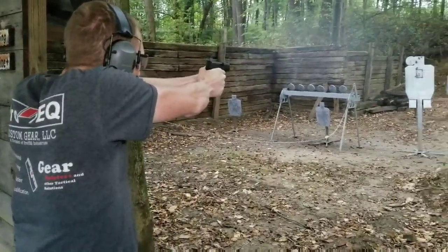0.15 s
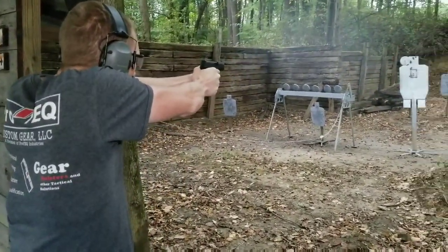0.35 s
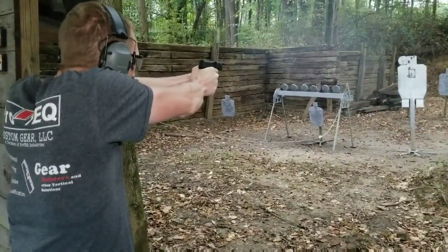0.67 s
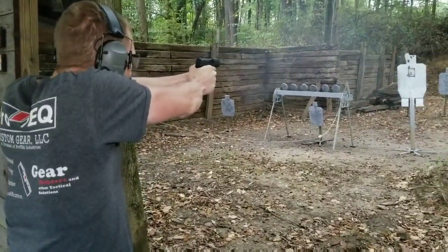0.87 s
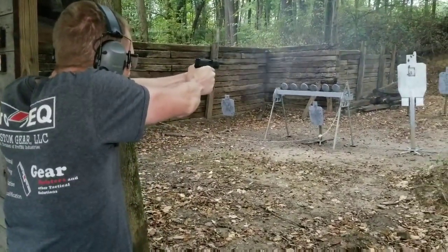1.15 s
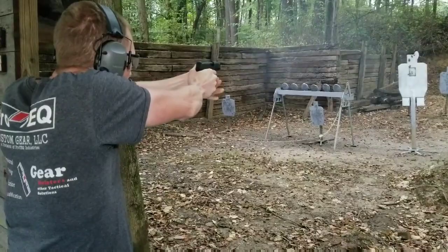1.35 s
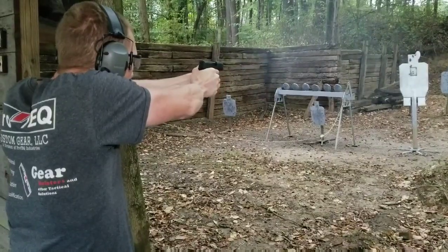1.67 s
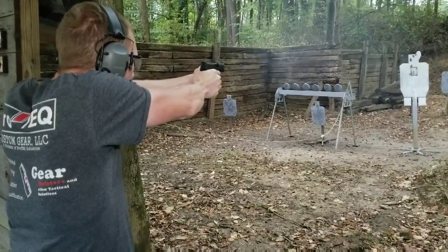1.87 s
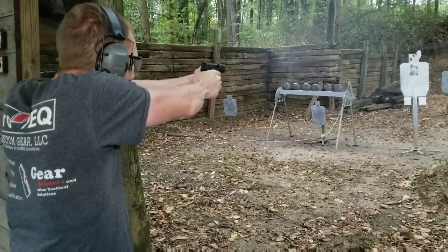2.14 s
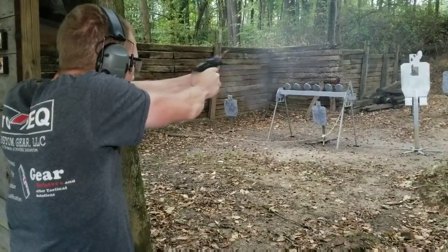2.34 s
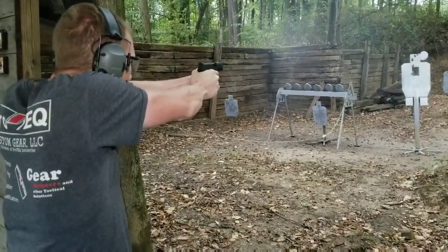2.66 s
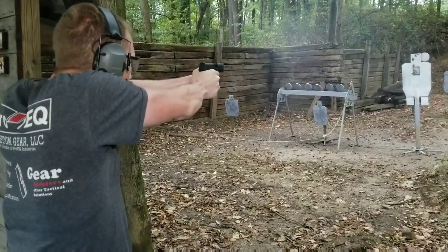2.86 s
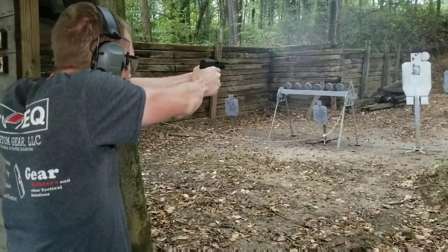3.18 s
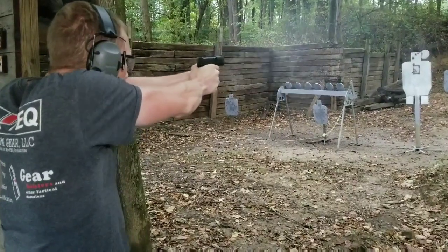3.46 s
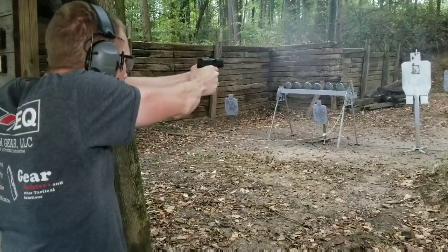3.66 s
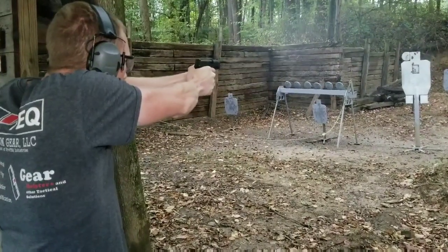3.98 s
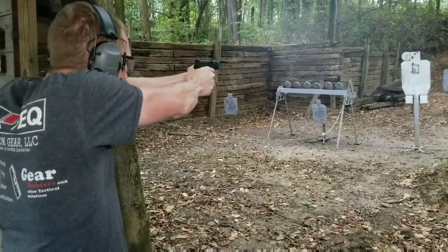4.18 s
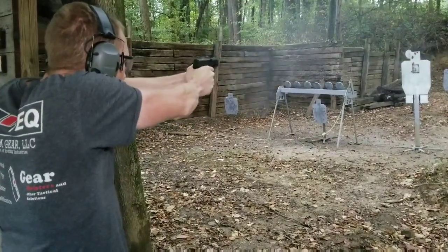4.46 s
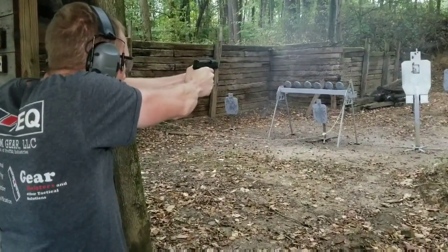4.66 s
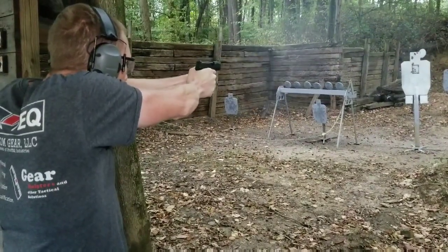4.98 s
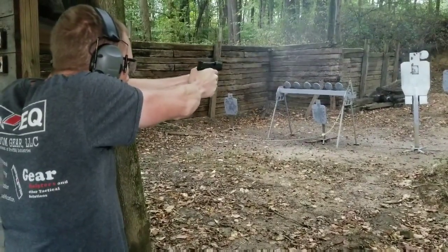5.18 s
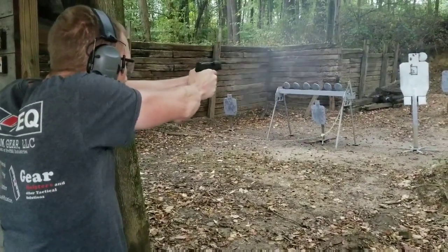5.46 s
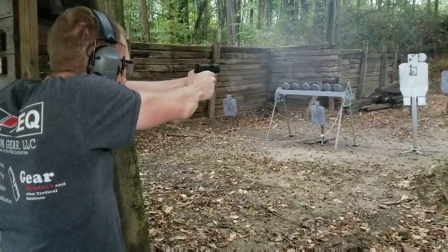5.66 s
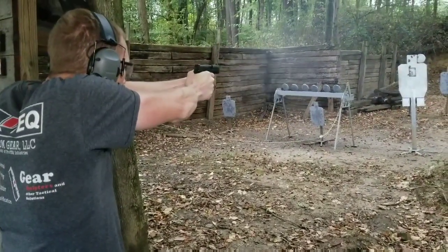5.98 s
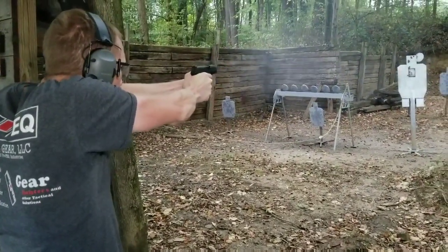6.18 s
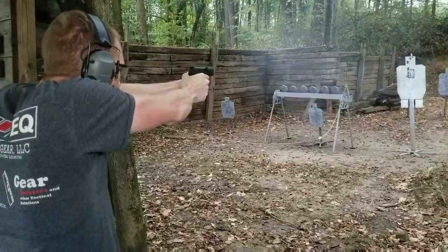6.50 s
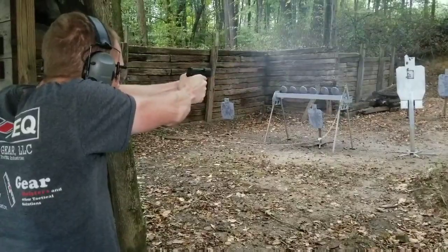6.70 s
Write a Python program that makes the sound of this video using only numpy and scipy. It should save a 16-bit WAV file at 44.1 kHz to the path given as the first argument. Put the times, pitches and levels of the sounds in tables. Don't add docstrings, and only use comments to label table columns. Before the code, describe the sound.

An echo fades, then a handgun fires six spaced single shots in a wooded clearing, with steel rattling and small brass cases landing on leaves.

```python
import sys
import numpy as np
from scipy import signal
from scipy.fft import rfft, irfft
from scipy.io import wavfile
from scipy.ndimage import uniform_filter1d

SR = 44100
rng = np.random.default_rng(int(sys.argv[2]) if len(sys.argv) > 2 else 0)


def volts_from_decibels(level):
    exponent = np.asarray(level, float) / 20
    return 10 ** exponent


def unload_audio(sound):
    columns = np.transpose(np.atleast_2d(sound))
    steps = np.round(np.clip(columns, -1, 1) * 32767)
    wavfile.write(sys.argv[1], SR, steps.astype(np.int16))


N = 301186
ECHO_SIZE = 76800

# frequency in Hz, level in dB per Hz.
CLEARING = [(18, -44.5), (30, -9.5), (168, -15), (237, -4), (292, -11.5), (359, -2.5), (500, -7),
            (720, -4.5), (1110, -5.5), (1590, -11.5), (2130, -12), (4200, -18.5), (8800, -28.5),
            (15500, -31.5)]
# frequency in Hz, level in dB per Hz.
TRUNKS = [(18, -66), (30, -25), (126, -14.5), (432, -18.5), (606, -2), (787, -9), (1110, -7), (1600, -16),
          (2130, -8.5), (3000, -14), (5740, -19), (8100, -16), (8900, -26.5), (15500, -32.5)]
# frequency in Hz, level in dB per Hz.
DEEP_WOODS = [(18, -72.5), (30, -32.5), (69, -24.5), (260, -19.5), (432, -13.5), (728, -12.5), (1100, -12),
              (1550, -15), (2200, -9.5), (2900, -19.5), (5000, -25), (8500, -29.5), (15500, -41)]
# delay in seconds, lift in dB.
REFLECTORS = [(.069, 2), (0.134, 2.5), (0.173, 2), (.212, 0.5), (.343, 1.5), (0.423, 0.5), (.52, 0.5)]


def evened(x):
    return x / np.sqrt(np.mean(x ** 2) + 1e-20)


def read(points, hz):
    f, value = np.transpose(points)
    return np.interp(np.log(hz + 1), np.log(f + 1), value)


def add(mix, s, sound):
    at = round(s * SR)
    sound = sound[:, max(-at, 0):]
    part = mix[:, max(at, 0):][:, :sound.shape[1]]
    part += sound[:, :part.shape[1]]


def ports(z, hz):
    # frequency in Hz, left-right likeness from -1 to 1.
    likeness = [(60, .6), (130, .8), (290, .86), (600, .78), (950, .55), (1410, .1), (3100, .05),
                (15000, -.05)]
    # frequency in Hz, left minus right in dB.
    lean = [(60, 2), (180, 0.5), (550, 1), (1650, 3), (4970, 1.0), (15000, -2.5)]
    same = np.clip(read(likeness, hz), -1, 1)
    tilt = volts_from_decibels(read(lean, hz) / 2)
    left = z[0] * tilt
    right = (same * z[0] + np.sqrt(1 - same ** 2) * z[1]) / tilt
    return np.array([left, right])


def hiss(spectrum, size):
    hz = np.fft.rfftfreq(size, 1 / SR)
    pair = ports(rfft(rng.standard_normal((2, size))), hz)
    return evened(irfft(pair * volts_from_decibels(read(spectrum, hz)), size))


def fading(x, t60s):
    hz, t, z = signal.stft(x, SR, nperseg=512, noverlap=384)
    z = z * volts_from_decibels(-60 * t / read(t60s, hz)[:, None])
    return signal.istft(z, SR, nperseg=512, noverlap=384)[1][:, :x.shape[1]]


def panned(x, pan_db):
    return x * volts_from_decibels(np.array([[pan_db / 2], [-pan_db / 2]]))


def quiet_air():
    # frequency in Hz, level in dB per Hz.
    air = [(18, -16.5), (40, -4.5), (90, -4), (160, -20.5), (369, 0), (747, 0.5), (1100, -6), (2130, -18.5),
           (3590, -29.5), (8000, -29.5), (15500, -34)]
    return volts_from_decibels(-77.5) * hiss(air, size=N)


def timber(size):
    # frequency in Hz, level in dB, t60 in seconds.
    shelter = [(123.5, -21, .15), (182.6, -20, 0.12), (231, -18, .12), (603, -13.5, 0.11), (742, -13, .14)]
    wall_s, wall_db, wall_hz, wall_t60 = 0.0646, 9.5, 720, 0.02
    slap_db, slap_db_per_s, slap_hz, slap_t60 = -11, -60, 680, 0.03
    t = np.arange(size) / SR
    late = np.maximum(t - wall_s, 0)
    wall_level = volts_from_decibels(wall_db - 60 * late / wall_t60) * np.clip(late / 0.0009, 0, 1)
    out = wall_level * np.sin(2 * np.pi * wall_hz * late)
    for s, lift in REFLECTORS[1:]:
        since = np.maximum(t - s + 0.00522, 0)
        rise = np.clip(since / 0.0022, 0, 1)
        level = volts_from_decibels(slap_db + lift + slap_db_per_s * s - 60 * since / slap_t60)
        out = out + level * rise * np.sin(2 * np.pi * slap_hz * since)
    for hz, db, t60 in shelter:
        level = volts_from_decibels(db - 60 * late / t60) * np.clip(t / 0.015, 0, 1)
        out = out + level * np.sin(2 * np.pi * hz * t)
    return out


def rolling_echo(place):
    # frequency in Hz, likeness of two shots from 0 to 1.
    repeat = [(60, .8), (300, .97), (1200, .96), (2500, .8), (6000, .45), (12000, .25)]
    # frequency in Hz, t60 in seconds.
    clearing_t60 = [(50, 0.16), (200, 0.28), (700, 0.26), (2000, 0.23), (5000, 0.19), (9000, 0.22),
                    (14000, .2)]
    # frequency in Hz, t60 in seconds.
    trunks_t60 = [(50, 0.82), (160, 0.72), (300, 0.98), (700, 1), (2000, 0.87), (5000, 0.84), (9000, .7),
                  (14000, 0.92)]
    # frequency in Hz, t60 in seconds.
    deep_t60 = [(100, 1.4), (700, 2.93), (2200, 1.985), (4000, 1.96), (8000, 1.3)]
    size = place[0].shape[1]
    same = read(repeat, np.fft.rfftfreq(size, 1 / SR))
    layers = []
    for old, colour in zip(place, (CLEARING, TRUNKS, DEEP_WOODS)):
        fresh = rfft(hiss(colour, size=size))
        layers.append(irfft(same * rfft(old) + np.sqrt(1 - same ** 2) * fresh, size))
    near, trees, far = layers
    echo = volts_from_decibels(13.5) * fading(near, clearing_t60)
    echo = echo + volts_from_decibels(-10) * fading(trees, trunks_t60)
    return echo + volts_from_decibels(-27) * fading(far, deep_t60)


def gas_crack(t):
    # frequency in Hz, level in dB per Hz.
    jet = [(1000, -25.5), (4000, -5.5), (9000, -7.5), (13500, -2), (16000, -2.5)]
    level_db, t60 = -8.5, 0.28
    return volts_from_decibels(level_db - 60 * t / t60) * np.clip(t / 0.0012, 0, 1) * hiss(jet, size=len(t))


def capsule_rumble(t, db):
    band = signal.butter(2, [45, 140], "band", fs=SR)
    sway = evened(signal.lfilter(*band, rng.standard_normal((2, len(t)))))
    return volts_from_decibels(db - 60 * np.maximum(t - 0.05, 0) / 0.1) * np.clip(t / 0.012, 0, 1) * sway


def case_ring(t, db, hz):
    flight = np.maximum(t - 0.058, 0)
    spin = 1 + 0.8 * evened(uniform_filter1d(rng.standard_normal(len(t)), size=200))
    ring = volts_from_decibels(db - 60 * flight / 0.66) * spin * np.sin(2 * np.pi * hz * flight)
    return panned(ring, 4.0)


def blast(place, wall, db, ring_db, ring_hz, rumble_db):
    t = np.arange(place[0].shape[1]) / SR
    echo = rolling_echo(place)
    level = np.sqrt(abs(uniform_filter1d((echo ** 2).mean(0), size=500)))
    echo = echo / (1.5 + level ** 2.32) ** (1 / 2.72)
    echo = echo * np.clip(t / 0.0016, 0, 1) ** 1.4 * (1 - 0.3 * np.exp(-t / 0.012))
    lift_db = 0
    for s, lift in REFLECTORS:
        blur_s = 0.0085 + 0.011 * s
        lift_db = lift_db + lift * np.exp(-0.5 * ((t - s) / blur_s) ** 2)
    echo = echo * volts_from_decibels(lift_db)
    loud = volts_from_decibels(db) * (echo + gas_crack(t) + wall) + capsule_rumble(t, rumble_db)
    return 1.238 * np.tanh(loud / 1.351) + case_ring(t, ring_db, ring_hz)


def thud(db, hz):
    t = np.arange(-0.04, 0.04, 1 / SR)
    return panned(volts_from_decibels(db) * np.exp(-0.5 * (t / 0.006) ** 2) * np.cos(2 * np.pi * hz * t), 0)


def shots(mix):
    # start in seconds, level in dB, ring of the ejected case in dB, its pitch in Hz,
    # capsule rumble in dB.
    pistol = [
        (-.45, -11, -71, 7920, -30),
        (0.6908, -10.5, -38.5, 7817, -34),
        (2.3395, -11.5, -53, 7620, -24.5),
        (3.3577, -12.5, -49, 7780, -28),
        (4.3495, -11.5, -52, 7720, -34.5),
        (5.3590, -10.5, -62, 7760, -20),
        (6.0570, -10.5, -48, 8140, -23.5),
    ]
    place = [hiss(colour, size=ECHO_SIZE) for colour in (CLEARING, TRUNKS, DEEP_WOODS)]
    wall = timber(size=ECHO_SIZE)
    bank_s, bank_db, bank_hz = 0.388, -58, 75
    for s, db, *case_and_rumble in pistol:
        add(mix, s, blast(place, wall, db, *case_and_rumble))
        add(mix, s + bank_s - 0.04, thud(db + bank_db, bank_hz))


def soil_thuds(mix):
    # centre in seconds, peak in dB.
    drops = [(.161, -60), (1.301, -62), (2.841, -64), (3.131, -73), (3.9771, -64), (4.0121, -70),
             (4.0451, -71.5), (4.948, -64), (4.987, -62.5), (5.9451, -61.5), (6.661, -62)]
    for s, db in drops:
        add(mix, s - 0.04, thud(db, hz=65))


def tick(db, hz, pan_db):
    t = np.arange(SR // 4) / SR
    colour = [(300, -22), (hz / 2.2, -12), (hz, 0), (hz * 1.8, -11), (30000, -20)]
    rustle_db = -8 - 0.5 * (db + 62)
    shape = volts_from_decibels(-60 * t / 0.013) + volts_from_decibels(rustle_db - 60 * t / 0.22)
    return panned(volts_from_decibels(db) * hiss(colour, size=len(t)) * shape, pan_db)


def case_ticks(mix):
    # start in seconds, peak in dB, centre in Hz, pan in dB.
    landings = [(0.492, -64, 4500, 2.5), (1.6125, -51, 4080, 2), (1.6336, -55, 12540, -4),
                (1.7536, -86, 7100, -4.5), (1.8356, -75, 5400, 8), (2.6924, -51.5, 12100, -1.2),
                (3.0271, -55, 13100, -1), (5.048, -58.5, 13040, -8.5), (5.2175, -54, 2970, 2.5),
                (5.9316, -57.5, 11040, 0), (6.5996, -70, 11300, 3), (6.709, -64.5, 10500, 1.6),
                (1.44, -90, 10000, 0), (1.994, -93.5, 7500, 0), (2.128, -96.5, 8000, 0),
                (2.19, -90, 7200, 0), (.493, -60, 13000, 0.5)]
    for s, db, hz, pan_db in landings:
        add(mix, s, tick(db, hz, pan_db))


def clank(modes, db, rattle_s, t60):
    # frequency in Hz, level in dB per Hz.
    rattle = [(59, -56.5), (100, -22), (576, -8), (774, -7.5), (1760, -4), (2180, -4), (2470, -8),
              (4800, -10), (15500, -24)]
    t = np.arange(SR // 2) / SR
    ring_db = -2.5 - 0.385 * (db + 56)
    shape = np.clip(t / 0.001, 0, 1) * volts_from_decibels(-60 * np.maximum(t - rattle_s, 0) / t60 - 60 * t)
    shape = shape + np.clip(t / 0.03, 0, 1) * volts_from_decibels(-15.0 - 60 * t / 0.85)
    grit = volts_from_decibels(2.0 * evened(uniform_filter1d(rng.standard_normal(len(t)), size=60)))
    sound = hiss(rattle, size=len(t)) * shape * grit
    for delay, hz, mode_db, decay in modes:
        since = np.maximum(t - delay, 0)
        wobble = uniform_filter1d(rng.standard_normal((2, len(t))), size=300)
        shiver = 1 + 0.3 * evened(wobble)
        held = np.maximum(since - 1.13 * rattle_s, 0)
        swell = np.clip(since / 0.0057, 0, 1) * volts_from_decibels(ring_db + mode_db - 60 * held / decay)
        sound = sound + np.sqrt(2) * swell * shiver * np.sin(2 * np.pi * hz * since)
    return panned(volts_from_decibels(db) * sound, -0.5)


def steel_flap(mix):
    # start in seconds, peak in dB, rattle length in seconds, t60 in seconds.
    knocks = [
        (2.831, -39.5, 0.042, 0.38),
        (3.0086, -53.5, 0.023, 0.45),
        (3.31, -59.5, 0.023, .21),
        (4.022, -51.5, 0.041, .58),
        (5.21, -61, 0.011, 0.12),
        (5.336, -54, 0.024, .21),
    ]
    # delay in seconds, frequency in Hz, level in dB, t60 in seconds.
    steel = [
        [(.03, 150, -15, .2), (.002, 1400, -4, .1), (.01, 2003, -5, .2), (.012, 2229, -2, .17),
         (.036, 4060, 0, .14), (.01, 3250, -8, .1), (.015, 5577, -16, .12), (.006, 4872, -10, .15),
         (.03, 6449, -14, .12), (.004, 9819, -14, .08)],
        [(.01, 603, -1, .14), (.012, 2239, 0, .18), (.012, 5000, -12, .1)],
        [(.006, 1950, -4, .15), (.006, 1150, -5, .15)],
        [(.004, 790, -3, .15), (.002, 1220, -4, .1), (.002, 1560, -4, .1), (.02, 3580, -13, .3),
         (.05, 1868, -12, .12), (.04, 4043, -12, .2), (.035, 5286, -20, .08)],
        [(.004, 1800, -5, .08), (.006, 2250, -8, .08)],
        [(.003, 1150, -3, .12), (.003, 1450, -3, .12)],
    ]
    for (s, *knock), modes in zip(knocks, steel):
        add(mix, s, clank(modes, *knock))


def scene():
    mix = quiet_air()
    shots(mix)
    soil_thuds(mix)
    case_ticks(mix)
    steel_flap(mix)
    return mix


def band_limit(x):
    return signal.sosfilt(signal.butter(12, 17010, fs=SR, output="sos"), x)


def record(dry):
    low_cut = signal.butter(2, 45, "high", fs=SR, output="sos")
    heard = signal.sosfilt(low_cut, dry)
    high_cut = signal.firwin(numtaps=201, cutoff=15750, window=("kaiser", 9), fs=SR)
    heard = signal.oaconvolve(heard, high_cut[None], "same")
    return band_limit(heard)


dry = scene()
out = record(dry)
unload_audio(out)
```